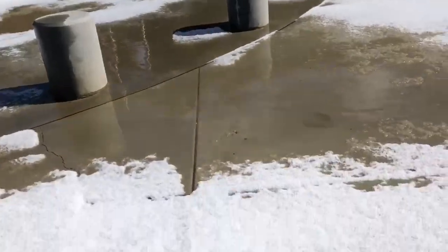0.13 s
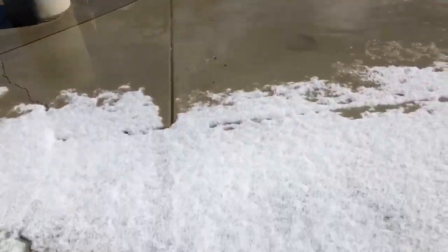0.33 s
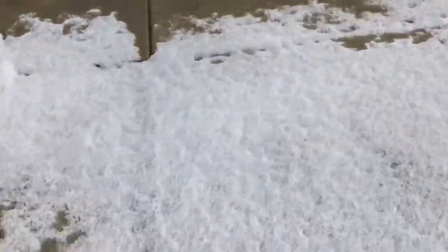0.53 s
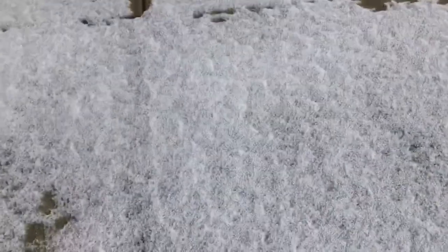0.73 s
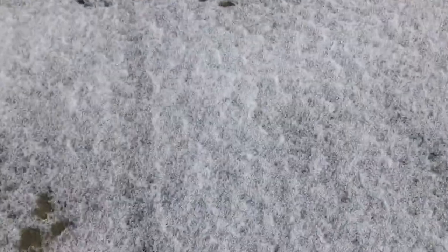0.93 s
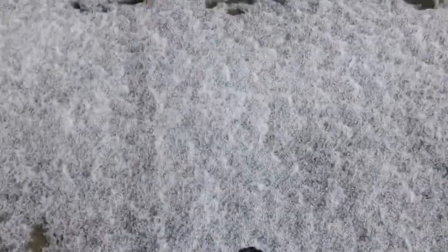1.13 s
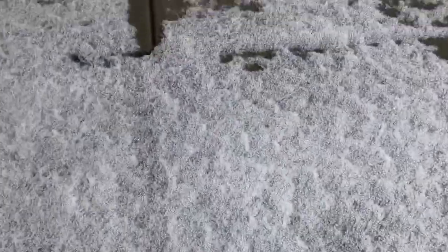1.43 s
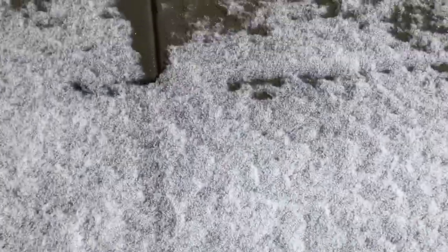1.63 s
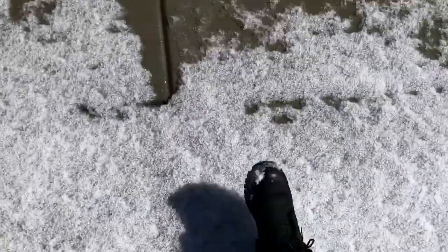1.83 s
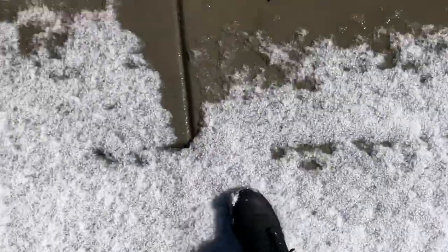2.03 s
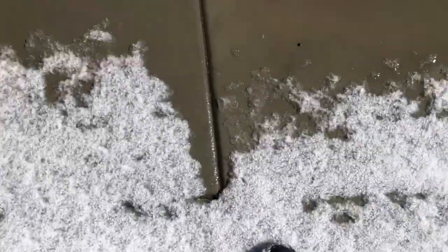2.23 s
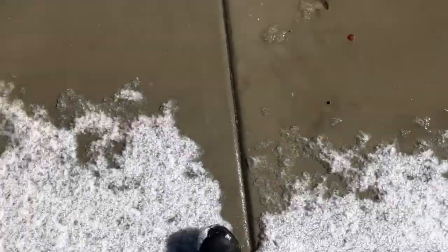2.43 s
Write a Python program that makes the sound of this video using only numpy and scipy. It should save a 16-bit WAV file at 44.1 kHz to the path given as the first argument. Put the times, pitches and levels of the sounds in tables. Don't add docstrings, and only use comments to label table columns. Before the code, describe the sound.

Close footsteps in wet slush on paving, each a crisp crack, grainy crunch and watery squeeze; low wind rumble buffets the microphone for the first second, then eases, over a faint distant outdoor hush.

```python
import sys
import numpy as np
from scipy import signal
from scipy.fft import rfft, irfft
from scipy.io import wavfile

SR = 44100
rng = np.random.default_rng(int(sys.argv[2]) if len(sys.argv) > 2 else 0)


def generate_wav(signal):
    frames = np.transpose(np.atleast_2d(signal))
    scaled = np.clip(frames, -1, 1) * 32767
    pcm = np.round(scaled).astype(np.int16)
    wavfile.write(sys.argv[1], SR, pcm)


def decibels_to_gain(level_db):
    exponent = np.asarray(level_db, float) / 20
    return 10 ** exponent


N = 114660

# time in seconds, strength in dB, brightness in dB per octave.
GUSTS = [(0, -40.5, 1.5), (.04, -33, -8), (.085, -50, -8), (.11, -34.5, 1), (.28, -36.5, -2.5),
         (.315, -51, -4.5), (.39, -30.5, 3.5), (.6, -33.5, -1.05), (.79, -35.5, -1.5), (1.0, -35, 0.5),
         (1.14, -36, -1.3), (1.2, -56, -6), (1.55, -63.5, 3.5), (1.72, -60, 0.5), (1.98, -64, -1),
         (2.1, -49, 1.5), (2.4, -40.5, -13.5), (2.52, -66.5, 3), (2.6, -75, 12.5)]
# frequency in Hz, level in dB per Hz.
PORT_SPECTRUM = [(15, -46), (25, -12), (45, -2.5), (64, -3), (152, 0.5), (358, -19), (474, -19.5),
                 (1030, -83), (1300, -34), (1690, -64), (2860, -120)]
# start in seconds, peak in dB, frequency in Hz.
PRESSURE_SWELLS = [(.04, -37, 89), (.195, -31.5, 93), (.29, -32.5, 81), (.365, -22.5, 108),
                   (.6, -29.5, 65.6), (.985, -30, 70), (.421, -16.5, 151), (.494, -28, 92), (.555, -21, 90),
                   (.705, -22, 100), (.746, -21.5, 140), (.825, -25.5, 96.5), (.938, -24.5, 91.5),
                   (1.126, -27, 103), (1.18, -41, 86), (1.23, -45.5, 106), (1.275, -52, 79),
                   (1.41, -43, 96), (1.455, -43, 103), (1.53, -42, 150), (1.64, -43.5, 86),
                   (1.69, -45.5, 77.5), (2.045, -44, 152), (2.156, -32, 125), (2.186, -38, 86),
                   (2.25, -38, 199), (2.265, -32, 90), (2.30, -37.5, 237), (2.355, -38, 207),
                   (2.37, -39.5, 77), (2.47, -45, 92)]
# start in seconds, peak in dB, frequency in Hz.
STRONG_EDDIES = [(.103, -32, 420), (.112, -30, 434), (.132, -29.5, 470), (.149, -33, 400), (.168, -33, 340),
                 (.216, -44, 334), (.283, -37.5, 420), (.347, -37, 384), (.355, -31, 327), (.371, -25, 438),
                 (.396, -30, 375), (.423, -30.5, 524), (.446, -36, 544), (.464, -21, 414),
                 (.490, -18.5, 544), (.545, -14.5, 485), (.571, -28, 400), (.586, -30, 504),
                 (.629, -35.5, 433), (.659, -45, 327), (.696, -27.5, 490), (.711, -27.5, 440),
                 (.743, -22.5, 553), (.772, -37, 320), (.806, -29.5, 347), (.838, -21.5, 452),
                 (.853, -20, 337), (.90, -29.5, 417), (.932, -28, 308), (.982, -26.5, 240),
                 (1.035, -30, 252), (1.07, -28.5, 396), (1.115, -26, 410), (1.30, -38.5, 595),
                 (2.147, -33.5, 254), (2.262, -45, 307), (2.298, -39, 318), (2.355, -40, 297)]
# frequency in Hz, level in dB per Hz.
HUSH_SPECTRUM = [(35, -21), (60, -13), (113, -2), (408, -4.5), (767, -6.5), (2650, -16), (12000, -28.5),
                 (16000, -28)]
# time in seconds, level in dB.
HUSH_LEVEL = [(0, 0.5), (2.2, 0.5), (2.36, 3), (2.5, -2), (2.6, 1.5)]
# time in seconds, level in dB, wetness in dB.
FOOTSTEPS = [
    [(0, -57, 10), (.035, -61.5, 10), (.07, -60.5, -5), (.11, -72, 20.5)],
    [(.535, -61.5, -15), (.563, -51.5, -26), (.607, -56.5, 3), (.66, -55.5, 12.5), (.70, -47, 8),
     (.745, -60.5, 9), (.79, -82, -7)],
    [(1.21, -67, -18), (1.27, -57, -5), (1.33, -59.5, 7), (1.39, -54.5, 4), (1.425, -43, -6),
     (1.45, -60, 15), (1.49, -65.5, 11.5), (1.56, -65, 2), (1.63, -78, 12)],
    [(1.85, -69, 1), (1.895, -52, -22), (1.93, -69, -17), (1.97, -63.5, -20), (2.01, -52, -7),
     (2.08, -56.5, 6.5), (2.14, -53, 4), (2.195, -59, -3), (2.215, -67, -3)],
]
# frequency in Hz, level in dB per Hz.
SLUSH_SPECTRUM = [(290, -32), (500, 4), (729, -3.5), (1420, -9.5), (2600, -3.5), (9000, -12.5),
                  (12000, -16), (16000, -10.5)]
# frequency in Hz, start in seconds, length in seconds, peak in dB.
ZIP_SHIVERS = [
    (4950, .005, .03, -63),
    (4950, .045, .045, -59),
    (10400, .015, .035, -57),
    (8600, .04, .05, -61),
]
# start in seconds, length in seconds, centre in Hz,
# width as a frequency ratio, peak in dB.
BRUSHES = [(0.009, 0.084, 9000, 1.25, -49.5), (0.303, 0.073, 7900, 1.7, -64),
           (0.403, 0.096, 8000, 1.8, -62), (0.653, 0.059, 2440, 1.12, -42), (0.764, 0.034, 4300, 1.08, -62),
           (1.336, .13, 1340, 1.33, -41), (1.481, 0.15, 7300, 1.12, -61), (1.489, 0.11, 1460, 1.12, -56),
           (2.001, 0.057, 3020, 1.05, -50.5), (2.121, 0.023, 1100, 1.38, -40.5),
           (1.87, 0.069, 13400, 1.5, -45)]
# start in seconds, peak in dB, centre in Hz, time to fall 60 dB in seconds,
# bright air in dB.
CRUST_BREAKS = [(0.041, -32.5, 1570, 0.0453, -13), (.524, -36.5, 9400, 0.027, -5),
                (0.551, -36, 9500, 0.0085, 0), (0.56, -39, 9200, 0.033, 8.5),
                (0.685, -40, 2300, 0.036, -12), (0.697, -23.5, 1460, 0.023, -14),
                (0.713, -35, 6160, 0.0143, 3), (1.108, -39, 1430, 0.026, 1), (1.24, -45, 3140, 0.036, -2),
                (1.267, -36, 2550, 0.063, 2), (1.413, -32, 1090, 0.075, -23),
                (1.883, -23.5, 1450, 0.017, 5.5), (1.8846, -25, 3550, 0.02, 7.5),
                (1.987, -35, 2760, 0.062, 8), (2.094, -41, 4930, 0.03, -4), (2.121, -28, 1370, 0.042, 3),
                (2.58, -27, 1170, 0.024, 2), (2.585, -34.5, 1100, 0.025, -19)]
# start in seconds, peak in dB, frequency in Hz.
DROPS = [
    (0.1666, -54, 5700),
    (0.767, -54, 6540),
    (0.888, -46.5, 13700),
    (1.0174, -49.5, 12100),
    (1.116, -43.5, 8900),
    (1.1314, -74, 5520),
    (1.497, -54, 8000),
    (2.2324, -58, 10600),
]
# start in seconds, peak in dB, frequency in Hz.
GRAIN_SNAPS = [(0.555, -37, 14500), (0.563, -43, 13300), (.566, -39.5, 8500), (0.573, -43, 9000),
               (0.574, -43, 4200), (.584, -47, 4800), (0.615, -53, 9500), (.629, -45.5, 6000),
               (.636, -46, 7900), (.641, -50, 8500), (.648, -42, 2760), (0.669, -49, 8200),
               (.678, -44, 2390), (0.702, -44, 3050), (.706, -39, 7500), (.721, -58, 7200),
               (0.731, -63, 5000), (0.741, -47.5, 7000), (.794, -61, 8040), (1.249, -41.5, 3320),
               (1.269, -47, 3500), (1.28, -49, 3200), (1.301, -45, 1740), (1.353, -47.5, 1210),
               (1.364, -40.5, 1160), (1.37, -48, 4500), (1.398, -55, 3500), (1.466, -45, 3600),
               (1.475, -58, 12500), (1.673, -61, 13800), (1.961, -47, 13500), (2.013, -50, 3480),
               (2.132, -34, 1190), (2.143, -47, 1800), (2.156, -47, 1400), (2.2, -51, 1930),
               (2.431, -56, 13500)]

SOFT_TOP_HZ = 15850


def rms_one(x):
    return x / np.sqrt(np.mean(x ** 2) + 1e-20)


def in_time(rows, column=1, rest=None):
    rows = np.array(rows)
    return np.interp(np.arange(N) / SR, rows[:, 0], rows[:, column], left=rest, right=rest)


def at_hz(spectrum, hz):
    points = np.array(spectrum)
    return np.interp(np.log(hz), np.log(points[:, 0]), points[:, 1])


def band(x, low_hz, high_hz, order=2):
    edges_hz = [low_hz, min(high_hz, .45 * SR)]
    return signal.sosfilt(signal.butter(order, edges_hz, "band", fs=SR, output="sos"), x)


def drift(rate_hz):
    r = np.exp(-2 * np.pi * rate_hz / SR)
    slow = signal.lfilter([1], [1, -2 * r, r * r], rng.standard_normal(N + SR))
    return rms_one(slow[SR:])


def clicks(per_s, spread_db):
    size = decibels_to_gain(spread_db * np.minimum(rng.exponential(1, N), 3.6)) * rng.choice([-1, 1], N)
    return size * (rng.random(N) < per_s / SR) + 1e-18


def coloured(spectrum):
    hz = np.maximum(np.arange(N // 2 + 1) * SR / N, 10)
    return rms_one(irfft(rfft(rng.standard_normal(N)) * decibels_to_gain(at_hz(spectrum, hz)), N))


def add(out, s, sound, peak_db):
    i = int(s * SR)
    scaled = decibels_to_gain(peak_db) * sound / np.max(np.abs(sound))
    out[i:i + len(sound)] += scaled[:N - i]


def wind():
    eddies_per_cycle, eddy_spread_db, lump_db, brighten = 1.4, 1.5, 1.6, .3
    lumps = drift(24)
    brightness = in_time(GUSTS, column=2)
    out = np.zeros(N)
    for hz in np.geomspace(45, 900, num=10):
        eddies = rms_one(band(clicks(eddies_per_cycle * hz, eddy_spread_db), hz / 1.319, hz * 1.17))
        octaves = max(np.log2(hz / 80), 0)
        lump = lumps * (.5 + brighten * octaves) + 0.98 * drift(3.4)
        lift_db = octaves * brightness + lump_db * lump
        out += eddies * np.sqrt(hz) * decibels_to_gain(at_hz(PORT_SPECTRUM, hz) + lift_db)
    return decibels_to_gain(in_time(GUSTS) - 24) * out


def outdoor_hush():
    return decibels_to_gain(-64 + in_time(HUSH_LEVEL) + drift(1.8)) * coloured(HUSH_SPECTRUM)


def ice_grains():
    grains_per_s, spread_db, clump_db = 5000, 2.5, 1.34
    wide = 1 + 1 / 3.35
    clump = drift(58)
    out = np.zeros(N)
    for hz in np.geomspace(600, 17000, num=16):
        grains = rms_one(band(clicks(grains_per_s / 16 * hz / 4000, spread_db), hz / wide, hz * wide))
        level_db = at_hz(SLUSH_SPECTRUM, hz) + clump_db * (1.15 * clump + drift(32))
        out += grains * np.sqrt(hz) * decibels_to_gain(level_db)
    return rms_one(out)


def wet_bubbles():
    out = np.zeros(N)
    for hz in np.geomspace(1230, 2250, num=8):
        out += band(clicks(160, 2.8), hz / 1.133, hz * 0.972) * (1000 / hz)
    return rms_one(out)


def slush():
    grain_db, fizz_db, wet_db = -0.5, -3.5, -9
    crunch = decibels_to_gain(grain_db) * ice_grains() + decibels_to_gain(fizz_db) * coloured(SLUSH_SPECTRUM)
    wet = wet_bubbles()
    out = np.zeros(N)
    for step in FOOTSTEPS:
        pressure = decibels_to_gain(in_time(step, rest=-120))
        out += pressure * (crunch + decibels_to_gain(wet_db + in_time(step, column=2)) * wet)
    return out


def zip_pull():
    out = np.zeros(N)
    for hz, s, length_s, db in ZIP_SHIVERS:
        n = int(length_s * SR)
        ring = band(rng.standard_normal(5000), hz / 1.015, hz * 1.015)
        add(out, s, ring[:n] * np.hanning(n), db)
    return out


def swishes():
    out = np.zeros(N)
    for s, length_s, hz, width, db in BRUSHES:
        n = int(length_s * SR)
        hiss = band(rng.standard_normal(8000), hz / width, hz * width)
        add(out, s, hiss[:n] * np.hanning(n), db)
    return out


def buffets():
    length_cycles, sag = 1.5, 0.89
    out = np.zeros(N)
    for s, db, hz in list(PRESSURE_SWELLS) + list(STRONG_EDDIES):
        cycles = np.arange(int(8 * SR / hz)) * hz / SR
        slowed = np.log1p(sag * cycles / 2) * 2 / sag * 1.382
        swing = np.sin(2 * np.pi * (slowed + rng.random()))
        add(out, s, swing * cycles ** 2 * np.exp(-3 * cycles / length_cycles), db)
    return out


def cracks():
    shards_per_s, base_air_db, body_db = 1400, -9, -4.5
    out, t = np.zeros(N), np.arange(3000) / SR
    for s, db, hz, t60, air_db in CRUST_BREAKS:
        shards = rng.standard_normal(3000) * (1 + 1.6 * (rng.random(3000) < shards_per_s / SR))
        swell_in = np.minimum(t / (2.41 * t60 ** 2), 1) ** 2
        shards = shards * decibels_to_gain(-60 * t / t60) * swell_in
        colour = rms_one(band(shards, hz / 1.57, hz * 1.34))
        late = np.roll(shards, 40)
        air = rms_one(band(late, 1400, 13400, order=1) + 2.3 * band(shards, 3100, 5200))
        body = rms_one(band(shards, 202, 710))
        add(out, s, colour + decibels_to_gain(base_air_db + air_db) * air + decibels_to_gain(body_db) * body, db)
    return out


def ticks():
    out, t = np.zeros(N), np.arange(1000) / SR
    for s, db, hz in DROPS:
        burst = rng.standard_normal(1000) * decibels_to_gain(-60 * t / 0.0097)
        add(out, s, band(burst, hz / 1.13, hz * 1.17), db)
    return out


def snaps():
    t60_s, rise_s, width = 0.017, 0.0013, 1.21
    out, t = np.zeros(N), np.arange(1500) / SR
    for s, db, hz in GRAIN_SNAPS:
        burst = rng.standard_normal(1500) * decibels_to_gain(-60 * t / t60_s) * np.minimum(t / rise_s, 1)
        add(out, s, band(burst, hz / width, hz * width), db)
    return out


def scene():
    port = band(wind() + buffets(), 47.5, 1100, order=3)
    crust = cracks()
    outside = outdoor_hush() + slush() + zip_pull() + swishes() + crust + ticks() + snaps()
    soft_top = signal.ellip(12, .5, 60, SOFT_TOP_HZ, fs=SR, output="sos")
    leak = .15 * band(crust, SOFT_TOP_HZ, 19000, order=4)
    return (port + signal.sosfilt(soft_top, outside) + leak)[None]


def low_pass(x):
    return signal.sosfilt(signal.butter(12, 16760, fs=SR, output="sos"), x)


def record(dry):
    top_cut = signal.cheby2(12, 70, 17100, fs=SR, output="sos")
    return low_pass(signal.sosfilt(top_cut, dry))


dry = scene()
out = record(dry)
generate_wav(out)
```